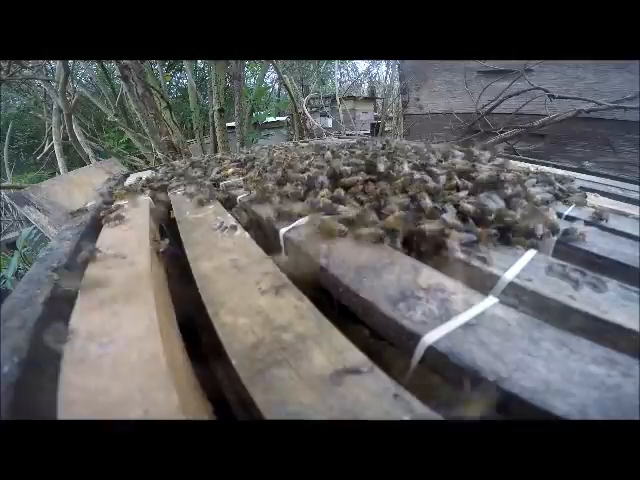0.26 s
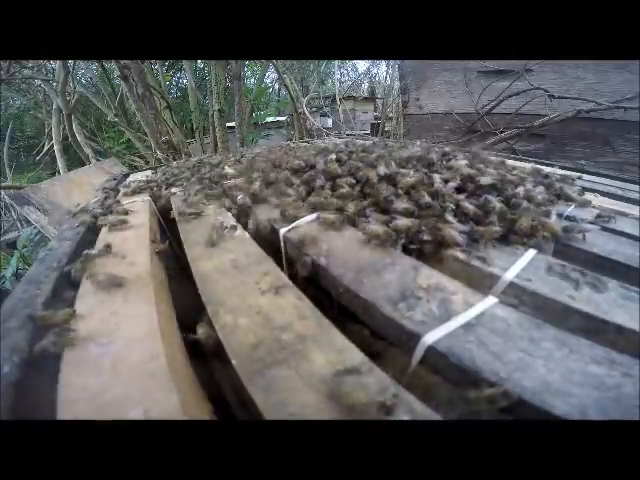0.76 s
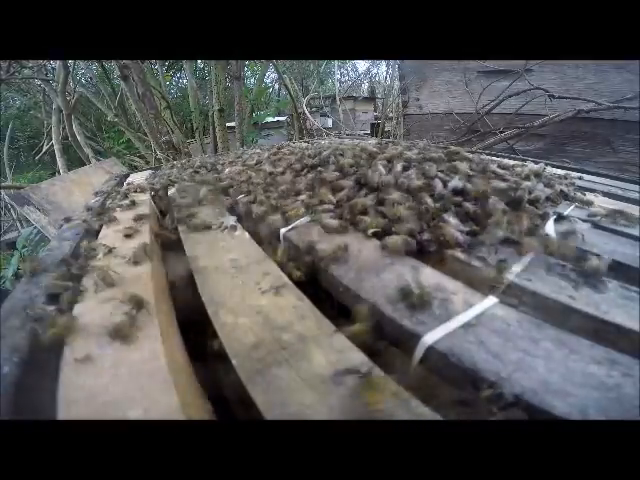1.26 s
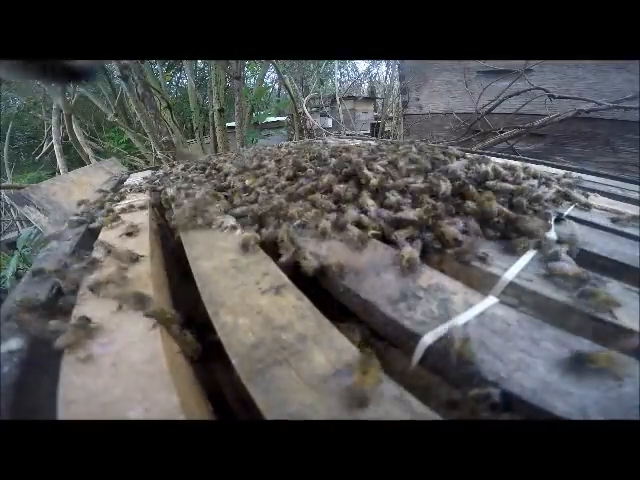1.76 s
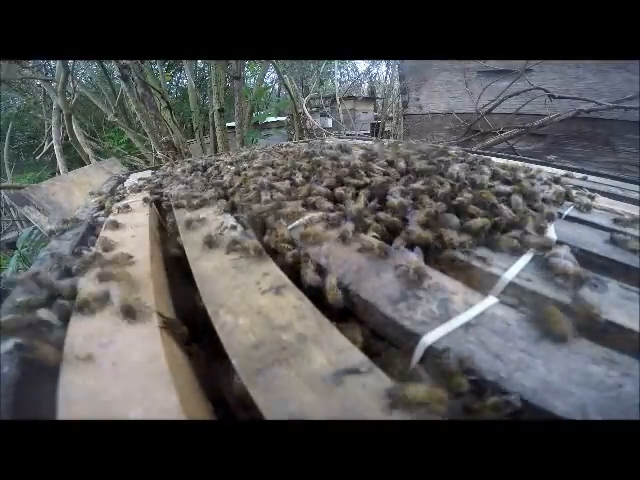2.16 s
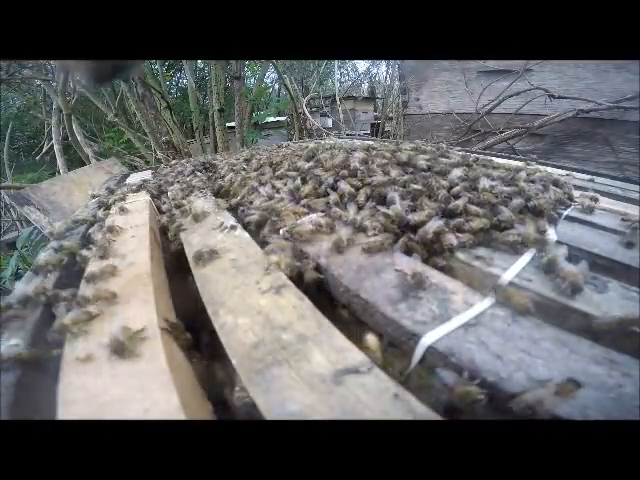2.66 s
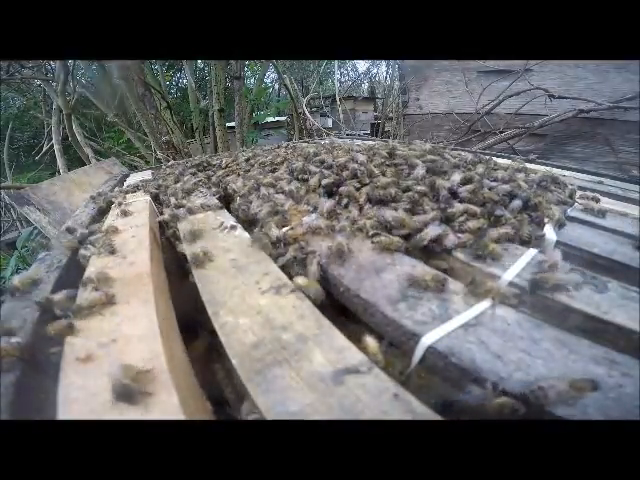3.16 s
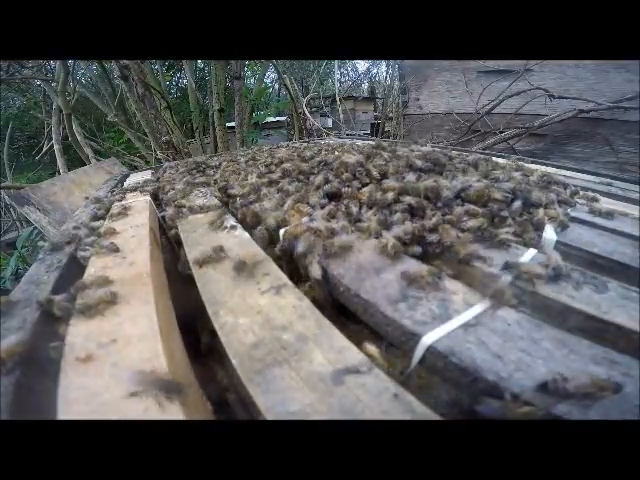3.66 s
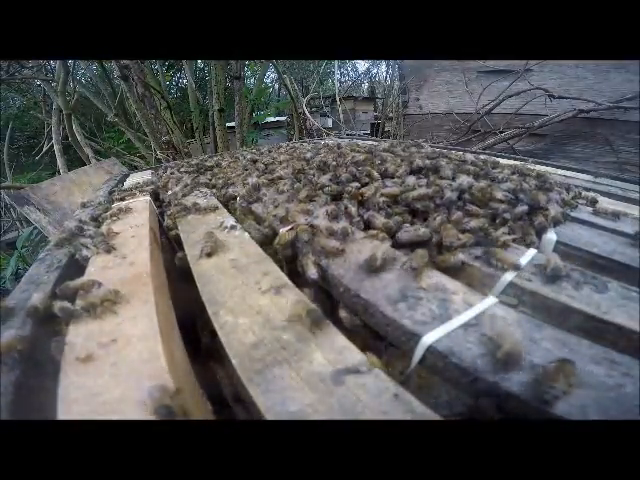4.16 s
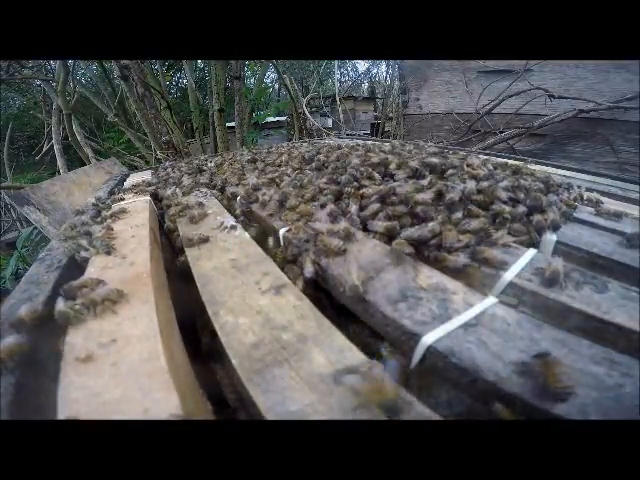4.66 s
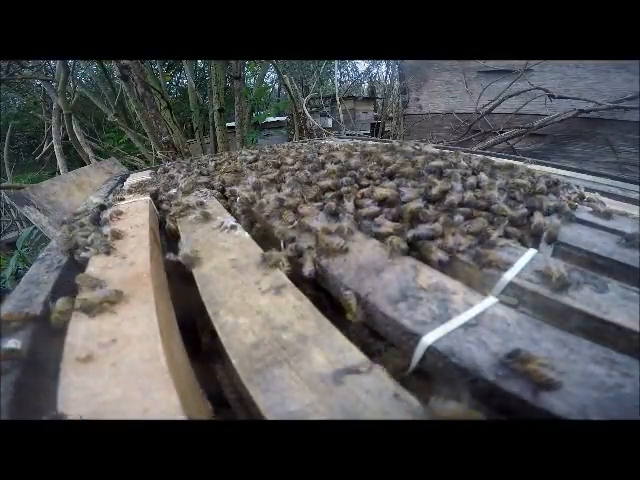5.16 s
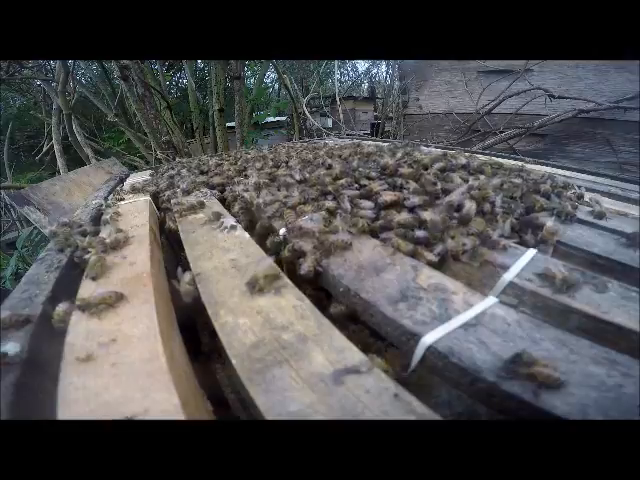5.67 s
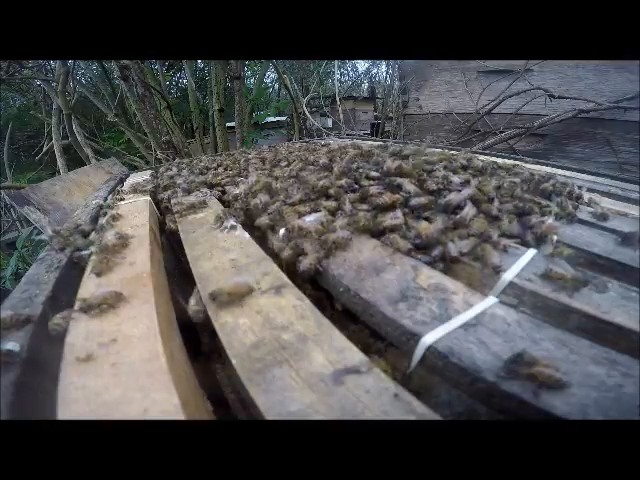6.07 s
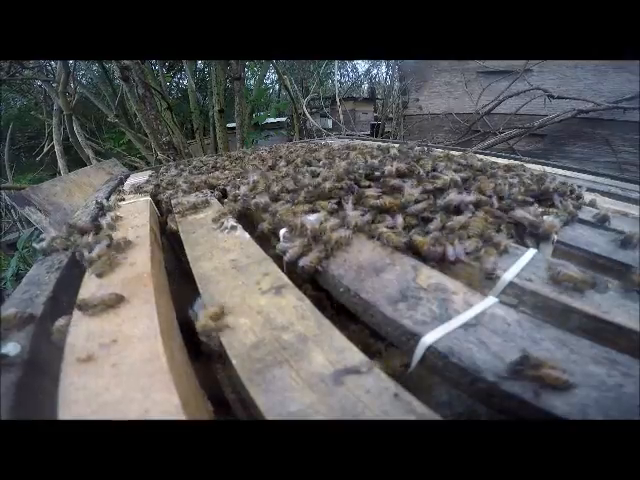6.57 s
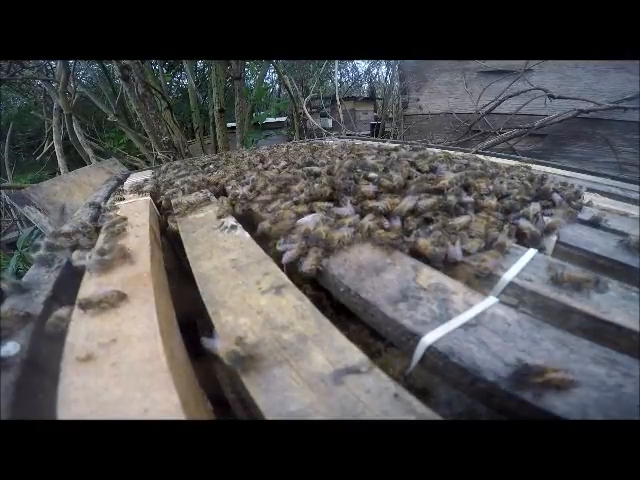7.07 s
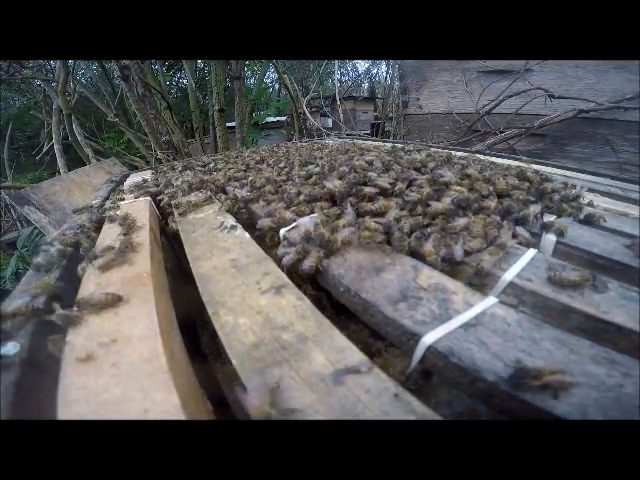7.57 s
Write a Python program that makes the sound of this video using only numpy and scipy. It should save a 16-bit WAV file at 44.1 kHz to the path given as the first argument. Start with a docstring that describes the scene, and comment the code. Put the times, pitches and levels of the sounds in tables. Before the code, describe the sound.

Bees shaken onto wooden hive bars, with a burst of knocks and patter, then a quiet rustle and a few low bumps.

```python
"""Shaking bees into a hive

Bees are shaken from a box onto the wooden bars of a hive. Knocks, scrapes and a patter of bodies
ring the bars, hard edges crack, the box thuds and shoves rock the stand. Underneath: sliding hiss,
two squeaks, the colony's rustle. A cased camera on the same wood whines faintly once a picture."""
import sys
import numpy as np
from scipy import signal
from scipy.io import wavfile
from scipy.ndimage import uniform_filter1d

SR = 44100
rng = np.random.default_rng(int(sys.argv[2]) if len(sys.argv) > 2 else 0)


def log_audio(samples):
    """Write samples as a 16-bit WAV file to the path given in sys.argv[1]."""
    # one column per channel
    frames = np.atleast_2d(samples).T
    # limit to full scale, then quantise
    limited = np.clip(frames, -1, 1)
    pcm = np.round(limited * 32767).astype(np.int16)
    wavfile.write(sys.argv[1], SR, pcm)


N = 344421

# blows on the wood: t/s, low-mode peak/dB, low f/Hz, upper re low/dB, upper f/Hz, contact/ms
BLOWS = [(0.087, -24.5, 877, -9, 1970, 0.94), (0.155, -17, 805, -15.5, 2270, 1.7),
         (0.164, -28, 820, -14, 1800, 1.9), (0.281, -30.5, 540, -9, 1630, 1.1),
         (0.304, -7, 823, -10.5, 1900, 1.45), (0.368, -9.5, 880, -15.5, 2150, 1.7),
         (0.409, -12, 777, -5.5, 1730, 1.4), (0.441, -16, 894, -31, 1640, 2.1),
         (0.448, -12, 915, 1.5, 1970, 3.2), (0.508, -26, 856, -8, 2020, 1.3),
         (0.534, -10.5, 800, -5.5, 2470, 1.4), (0.559, -18, 770, -5, 2440, 2.1),
         (0.576, -16.5, 940, 0, 3050, 1.7), (0.593, -19.5, 820, 2, 3100, 1.9),
         (0.61, -12.5, 723, -2, 1850, 1.06), (0.628, -12.5, 905, -8, 1940, 0.94),
         (0.646, -17.5, 837, 11, 2230, 0.5), (0.695, -10.5, 920, 9.5, 1890, 1.16),
         (0.738, -27, 552, -17, 3000, 2.7), (0.859, -18.5, 880, -9.5, 1620, 0.85),
         (0.887, -17.5, 848, -31, 1730, 1.5), (0.933, -15, 860, -13, 2470, 1.3),
         (0.944, -11.5, 830, -7, 1540, 1.8), (0.973, -4, 896, -13, 1990, 1.1),
         (1.025, -4.5, 920, -9.5, 2470, 2), (1.067, -27, 920, -22, 1960, 1.9),
         (1.091, -7.5, 870, 0, 1730, 0.79), (1.12, -14.5, 1130, -7, 2400, 1.4),
         (1.143, -10.5, 840, -20, 2470, 1.1), (1.177, -8, 680, -31, 1600, 1.2),
         (1.186, -5, 790, -10.5, 1670, 0.99), (1.193, -14, 840, -14, 2420, 1.4),
         (1.225, -18, 880, -0.5, 2500, 1.8), (1.25, -7.5, 750, -9, 1950, 2.1),
         (1.266, -3, 840, -9, 1990, 3.7), (1.304, -9.5, 1280, 1, 1730, 0.61),
         (1.312, -15, 1360, 6, 1770, 0.87), (1.32, -3, 1320, 7, 1840, 0.84),
         (1.344, -11.5, 883, -9.5, 1850, 1.5), (1.364, -5, 890, 0, 2220, 1.2),
         (1.401, -12.5, 910, -4.5, 2620, 2), (1.423, -12.5, 800, -20, 1740, 1.1),
         (1.445, -16, 820, -13, 1990, 1.3), (1.452, -10.5, 787, -6.5, 1980, 2.9),
         (1.494, -20, 1220, 2, 1820, 2), (1.519, -9, 950, -8.5, 2460, 1.2),
         (1.588, -1, 1350, -1.5, 3460, 1.18), (1.64, -16, 1130, -5, 2970, 1.5),
         (1.647, -11, 864, -14, 2770, 2.6), (1.664, 3, 698, -20, 1780, 0.51),
         (1.717, -20.5, 825, -0.5, 1900, 0.9), (1.772, -23, 950, -4.5, 2660, 2.1),
         (1.838, -26.5, 946, -9.5, 2470, 1.3), (1.976, -34, 832, 1.5, 2470, 0.98),
         (2.023, -17.5, 930, -9.5, 1830, 1.9), (2.05, -24, 870, -26, 1780, 0.61),
         (2.074, -26, 860, -0.5, 2720, 1.3), (2.126, -21.5, 1350, -8.5, 2510, 2),
         (2.184, -24, 859, -6, 2280, 1.26), (2.282, -39, 870, 10, 2560, 1.1),
         (2.528, -33, 670, -17.5, 1680, 1.6), (2.592, -29, 940, -23, 1670, 3.6),
         (2.681, -31, 557, -13.5, 1950, 1.7), (3.202, -32, 750, 0, 2470, 1.2),
         (3.384, -35, 604, 2.5, 1600, 0.86), (3.495, -39, 870, 2.5, 2380, 1.3),
         (3.625, -30, 1190, 15, 3130, 0.5), (4.098, -23, 844, -9, 1600, 0.98),
         (4.284, -21, 744, -16, 1580, 1.4), (4.295, -32, 570, -3, 1610, 3.5),
         (4.453, -39, 580, -10, 2340, 3.3), (4.729, -31.5, 869, -12, 1660, 0.97),
         (4.75, -32.5, 835, -21, 2280, 1.1), (5.083, -39, 870, -6, 1620, 2),
         (6.519, -21, 615, -11, 2400, 0.69), (6.565, -20, 673, -10, 2450, 0.72),
         (6.634, -34, 514, -13, 2520, 1.5), (6.656, -23, 667, -19, 1670, 1.5),
         (6.688, -32.5, 533, -9, 1820, 1.5), (6.739, -32, 584, -8.5, 1770, 1.5),
         (7.244, -23, 653, -7, 2430, 0.5)]
# modes of bars and camera case: f/Hz, t60/s, gain/dB
BAR_MODES = [(560.6, 0.063, -1.5), (702.4, 0.084, -6), (810.5, 0.027, 2.5), (893, 0.055, -1),
             (1012, 0.049, -4), (1218.5, 0.056, 0), (1347, 0.042, -8.5), (1680, 0.017, 2.5),
             (1986, 0.029, -2.5), (2455, 0.018, 3), (2988, 0.025, -1), (3400, 0.025, -7),
             (3850, 0.023, -10.5), (4400, .015, -6.5), (4950, 0.0052, -8.5)]
# low modes of the hive box: f/Hz, t60/s, gain/dB
BOX_MODES = [(64.8, 0.055, 0), (83.4, 0.11, -0.5), (125.4, 0.3, -9.5), (143.5, 0.061, -0.5),
             (199, 0.046, -4.5), (272.4, 0.06, -11)]
# hard contacts: t/s, body peak/dB, treble re body/dB, t60/ms
CRACK_HITS = [(0.2229, -39, 0, 9.5), (0.306, -37, -12, 7), (0.4209, -35, -15, 9.9), (0.454, -31, -14, 8),
              (0.5346, -32, -18, 9.6), (0.5836, -19, -19, 14), (0.594, -21, -9, 18),
              (0.6475, -11, -19, 4.5), (0.9093, -29.5, 3.5, 5.4), (1.0916, -7.5, -17.5, 11),
              (1.1274, -23, -12, 10), (1.218, -20, -2, 5.7), (1.2535, -30, -10, 8),
              (1.3028, -12.5, -1.5, 8.9), (1.313, -16, 3, 8), (1.3219, -0.5, -29.5, 16),
              (1.3628, -14, -8, 10), (1.401, -31, -1, 8), (1.4566, -27, -14, 8), (1.511, -28, -11, 10),
              (1.5905, 5.5, -12, 9.4), (1.6417, -25, -9, 8.5), (1.663, -5, -18, 13.4),
              (1.7789, -39, -14.5, 9.1), (1.93, -41, -2, 8.7), (2.0752, -31, -9, 12),
              (2.2886, -27.5, -2, 5.7), (3.382, -35, -14, 8), (3.495, -41, -11.5, 8),
              (3.6262, -24, -13, 6.3), (4.4954, -35.5, -8.5, 8), (6.5196, -47.5, -4.5, 8),
              (6.564, -25, -9, 8), (7.2434, -35, -12, 8)]
# resonances of a crack's body: f/Hz, width/Hz, gain/dB
CRACK_MODES = [(4220, 1000, 16), (4500, 1000, -13.5), (4610, 1650, 14.5), (6700, 380, 9.5)]
# drags along the bars: t/s, length/s, level/dB, upper-mode gain/dB
DRAGS = [(0.406, 0.027, -36.5, -4), (0.557, 0.065, -33.5, -8), (0.932, 0.041, -32.5, -8.5),
         (1.019, 0.039, -26, -26), (1.114, 0.035, -31, 1), (1.249, 0.04, -28, -6), (1.4, 0.081, -38.5, 0.5),
         (1.632, 0.033, -27, -14.5), (2.698, .16, -52, -27), (4.104, 0.023, -49, -7)]
# handling envelopes: t/s, patter/dB, box thud/dB, stand sway/dB
HANDLING = [(0, -44, -43, -43.5), (.26, -52.5, -48, -50), (.32, -45.5, -30.5, -62), (.52, -36, -31.5, -47),
            (.6, -27, -29, -31), (.7, -37, -36, -42), (.88, -37.5, -38, -65), (1.03, -25, -21.5, -31),
            (1.27, -30.5, -28.5, -32), (1.66, -32, -29.5, -37), (1.78, -44.5, -37.5, -32),
            (1.95, -50.5, -54, -37.5), (2.11, -41.5, -33.5, -42), (2.28, -46.5, -50, -40.5),
            (2.66, -54.5, -49.5, -50), (2.73, -51.5, -38, -36), (2.9, -54, -44.5, -36.5),
            (3.09, -53, -56.5, -48), (4.06, -55.5, -58.5, -51.5), (4.3, -52, -57.5, -40),
            (4.55, -55.5, -59, -49), (6.45, -58.5, -59.5, -52.5), (6.53, -60, -39, -27.5),
            (6.72, -57.5, -36, -30), (6.92, -61.5, -68, -39), (7.14, -61.5, -55, -36.5),
            (7.22, -60.5, -44, -31), (7.42, -62, -57, -38.5), (7.56, -57, -70, -47.5)]
# shoves on the stand: t/s, rocking gain/dB, f/Hz, t60/s, thump peak/dB
STAND_SHOVES = [(6.509, -32, 31.4, .3, -37), (6.523, -1.5, 32.1, 0.39, -19), (6.633, -35.5, 32, 0.25, -17),
                (6.649, -4, 32.6, 0.55, -16), (6.677, -16.5, 34.9, 0.38, -23),
                (6.753, 0.5, 37.3, 0.18, -30), (7.165, -6, 34.3, 0.27, -42),
                (7.22, -16.5, 33.8, 0.69, -36.5), (7.278, -9, 31.7, 0.072, -39.5)]
# hiss of sliding bees: t/s, level/dB
SLIDE_LEVELS = [(0, -58), (1.24, -54), (1.66, -55.5), (1.76, -65), (2.15, -61.5), (4.0, -73.5)]
# squeaks: t/s, length/s, f/Hz, width/Hz, throb/Hz, level/dB
SQUEAK_EVENTS = [(2.948, 0.032, 6900, 490, 90.6, -60.5), (4.491, 0.04, 4730, 350, 142, -55)]
# rustle spectrum: f/Hz, band gain/dB
COLONY_SPECTRUM = [(53, -33), (90, -3), (173, -61), (215, -1), (273, -4), (431, -1.5), (481, 1.5),
                   (536, -36.5), (777, 40.5), (885, -6.5), (5880, -21), (6420, -34), (7800, -19.5),
                   (14700, -35.5), (16400, -51)]
# electronic tones: f/picture rate, duty/1, level/dB
WHINE_TONES = [(210.5, .93, -64), (286, .16, -68), (421, 1, -78)]

UPPER_HZ = 1550  # divides low and upper bar modes
LN_1000 = np.log(1000)  # 60 dB of decay


def undb(db):
    return 10 ** (np.asarray(db) / 20)


def level(x, rms_db):
    return x * undb(rms_db) / np.sqrt(np.mean(x ** 2))


def peak(x, peak_db):
    return x * undb(peak_db) / np.abs(x).max()


def band(x, hz, *widths_hz):
    """Two-pole resonances in series, one per width; gain 1 at the centre."""
    for width_hz in widths_hz:
        x = signal.lfilter(*signal.iirpeak(hz, hz / width_hz, fs=SR), x)
    return x


def walk(rate_hz):
    """Slewed random steps, spread about 0.4."""
    hold = int(SR / rate_hz)
    return 0.5 * uniform_filter1d(np.repeat(rng.standard_normal(N // hold + 1), hold), hold)[:N]


def add(out, start_s, x):
    i = int(start_s * SR)
    out[i:i + len(x)] += x[:N - i]


def knocks(scatter_db=2.5, detune=.015, roughness=0.28, grain_hz=200):
    """Blows ring the bar modes near their own pitches; longer contacts rise slower and ring longer."""
    out, t = np.zeros(N), np.arange(6144) / SR
    hz, t60_s, mode_db = (column[:, None] for column in np.transpose(BAR_MODES))
    upper = hz[:, 0] > UPPER_HZ
    draws = rng.standard_normal((len(BLOWS), 3, len(BAR_MODES), 1))
    lowpass = signal.butter(4, grain_hz, fs=SR, output="sos")
    grains = signal.sosfilt(lowpass, rng.standard_normal((len(BLOWS), len(t))))
    for blow, (scatter, mistune, phase), grain in zip(BLOWS, draws, grains / grains.std()):
        start_s, peak_db, low_hz, upper_db, upper_hz, contact_ms = blow
        away_oct = np.abs(np.log2(hz / np.where(hz > UPPER_HZ, upper_hz, low_hz)))
        gain = undb(mode_db - np.minimum(50 * away_oct, 14) + scatter_db * scatter)
        rise = (1 - np.exp(-t * 1000 / contact_ms)) ** 2
        fade = np.exp(-LN_1000 * t / (t60_s * 0.68 * contact_ms ** 0.42))
        tones = np.sin(2 * np.pi * hz * (1 + detune * mistune) * t + 3 * phase)
        ring = gain * rise * fade * (1 + roughness * grain) * tones
        bars = peak(ring[~upper].sum(0), 0) + peak(ring[upper].sum(0), upper_db)
        add(out, start_s, undb(peak_db) * (bars + thump(t, -17)))
    return out


def thump(t, peak_db, rise_s=.0027):
    """The box answers a blow with its low modes."""
    ring = sum(undb(db) * np.exp(-LN_1000 * t / t60_s) * np.sin(2 * np.pi * hz * t)
               for hz, t60_s, db in BOX_MODES)
    return peak(ring * (1 - np.exp(-t / rise_s)), peak_db)


def cracks(rise_s=0.00023):
    """Hard edges meet: milliseconds of noise through high resonances."""
    out, t = np.zeros(N), np.arange(2048) / SR
    for start_s, peak_db, treble_db, t60_ms in CRACK_HITS:
        envelope = (1 - np.exp(-t / rise_s)) * np.exp(-LN_1000 * t * 1000 / t60_ms)
        burst = rng.standard_normal(len(t)) * envelope
        body = sum(undb(db) * band(burst, hz, 2 * width_hz, width_hz)
                   for hz, width_hz, db in CRACK_MODES)
        treble = band(burst, 9600, 6500, 6500)
        add(out, start_s, peak(body, peak_db) + peak(treble, peak_db + treble_db))
    return out


def scrapes():
    """Wood drags on wood: a swell of noise through the bar modes."""
    out = np.zeros(N)
    for start_s, length_s, level_db, upper_db in DRAGS:
        t = np.arange(int(length_s * SR)) / SR
        friction = rng.standard_normal(16384)[:len(t)] * np.sin(np.pi * t / length_s) ** .5
        drag = np.pad(friction, (0, 2048))
        rasp = sum(level(band(drag, hz, 12 / t60_s, 2.4 / t60_s), db + upper_db * (hz > UPPER_HZ))
                   for hz, t60_s, db in BAR_MODES)
        add(out, start_s, level(rasp, level_db))
    return out


def patter(low_db, rate_hz=200, scatter_db=4):
    """Soft bodies land at random; each contact reaches each bar mode differently."""
    hits = rng.random(N) < rate_hz / SR
    size_db = 3.1 * np.minimum(rng.exponential(size=N), 4)
    crawl = 1.2 * np.clip((-30 - low_db) / 10, .3, 2.5)  # rubbing feet: larger share when calm
    low, upper = 0, 0
    for hz, t60_s, db in BAR_MODES:
        ticks = hits * undb(size_db + scatter_db * rng.standard_normal(N))
        contact = uniform_filter1d(uniform_filter1d(ticks, size=130), size=130)
        force = (contact + crawl * contact.mean()) / (1 + crawl) * rng.standard_normal(N)
        ring = level(band(force, hz, 8.4 / t60_s, 13.5 / t60_s), db)
        if hz > UPPER_HZ:
            upper += ring
        else:
            low += ring
    upper_db = -7 - 0.14 * (low_db + 49.5)  # duller when louder
    return undb(low_db) * (level(low, 0) + level(upper, upper_db))


def shoves(rise_s=0.017, overtone_ratio=2.1, overtone_db=-9):
    """Shoves thump the box and set the stand rocking."""
    out, t = np.zeros(N), np.arange(SR) / SR
    for start_s, rock_db, hz, t60_s, thump_db in STAND_SHOVES:
        envelope = (1 - np.exp(-t / rise_s)) * np.exp(-LN_1000 * t / t60_s)
        phase = 2 * np.pi * hz * t
        rock = envelope * (np.sin(phase) + undb(overtone_db) * np.sin(overtone_ratio * phase))
        add(out, start_s, thump(t, thump_db) - undb(rock_db) * rock)
    return out


def sway(base_db, wander_db=8):
    """The stand sways: a deep, wandering rumble."""
    gain = undb(base_db + wander_db * walk(18))
    rumble = band(band(rng.standard_normal(N), 45, 31), 35.3, 27)
    return gain * level(rumble, 0)


def thuds(level_db):
    """Uneven jolts of handling drive the box modes."""
    jolts = rng.standard_normal(N) * undb(9.7 * walk(31))
    box = sum(level(band(jolts, hz, 5 / t60_s, 4 / t60_s), db) for hz, t60_s, db in BOX_MODES)
    return level(box, level_db)


def slide(hump_hz=6900, width_hz=1300):
    """Countless bodies brush past each other: even hiss with a high hump."""
    noise = rng.standard_normal(N)
    hump = band(noise, hump_hz, width_hz, width_hz)
    shoulders = undb(-7) * band(noise, 9500, 8900) + undb(-4) * band(noise, 5500, 1500)
    return level(hump + shoulders, np.interp(np.arange(N) / SR, *np.transpose(SLIDE_LEVELS)))


def squeaks():
    """Brief narrow rasps that throb."""
    out = np.zeros(N)
    for start_s, length_s, hz, width_hz, throb_hz, level_db in SQUEAK_EVENTS:
        t = np.arange(int(length_s * SR)) / SR
        rasp = band(rng.standard_normal(len(t)), hz, width_hz, width_hz)
        throb = np.sin(np.pi * throb_hz * t) ** 2
        envelope = np.sin(np.pi * t / length_s) ** .5
        add(out, start_s, level(rasp * throb * envelope, level_db))
    return out


def colony(level_db=-56, swell_db=0.3, flicker_db=3):
    """Wings and feet of the crowd: half-octave bands swell together and flicker alone."""
    out, swell = 0, walk(21)
    curve_hz, curve_db = np.transpose(COLONY_SPECTRUM)
    for hz in 110 * 2 ** np.arange(0, 7.4, .5):
        band_db = np.interp(np.log(hz), np.log(curve_hz), curve_db)
        gain = undb(band_db + swell_db * swell + flicker_db * walk(17))
        out += gain * band(rng.standard_normal(N), hz, hz / 2, hz / 2)
    return level(out, level_db)


def whine(picture_hz=30000 / 1001, sync_s=7.606):
    """Camera electronics: tones that restart with every picture."""
    cycle = (np.arange(N) / SR - sync_s) * picture_hz % 1
    return sum(undb(db) * (cycle < duty) * np.sin(2 * np.pi * multiple * cycle)
               for multiple, duty, db in WHINE_TONES)


def scene():
    """Mono mix of wood, bees and whine."""
    times_s, *curves_db = np.transpose(HANDLING)
    patter_db, thud_db, sway_db = (np.interp(np.arange(N) / SR, times_s, db) for db in curves_db)
    bars = knocks() + scrapes() + cracks() + patter(patter_db)
    stand = shoves() + sway(sway_db) + thuds(thud_db)
    return (bars + stand + slide() + squeaks() + colony() + whine())[None]


def record(dry, threshold_db=-42, strength=.05, recovery_s=.4, cutoff_hz=15500):
    """Gain control ducks after loud clatter and recovers slowly; the converter clips; the top is cut."""
    clatter = band(dry, 870, 1100) ** 2
    step = 1 / (recovery_s * SR)
    power = signal.lfilter([step], [1, step - 1], clatter)
    gain = (1 + power / undb(threshold_db) ** 2) ** -strength
    lowpass = signal.ellip(8, .2, 70, cutoff_hz, fs=SR, output="sos")
    return signal.sosfilt(lowpass, np.clip(dry * gain, -.9, .9))


dry = scene()
out = record(dry)
log_audio(out)
```